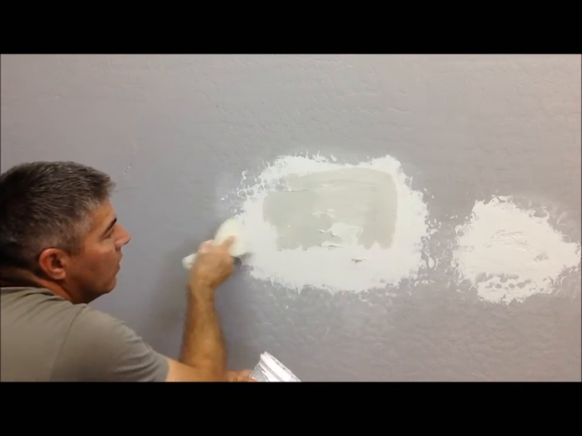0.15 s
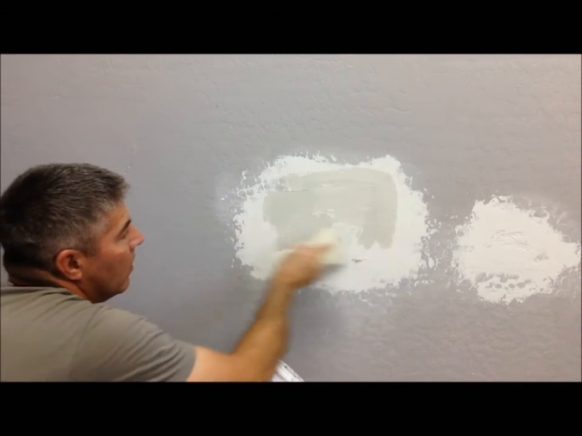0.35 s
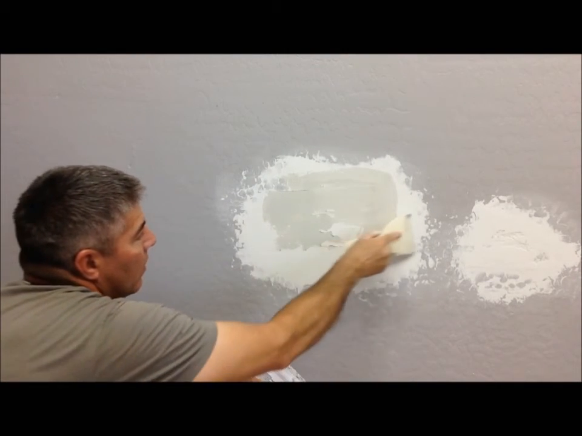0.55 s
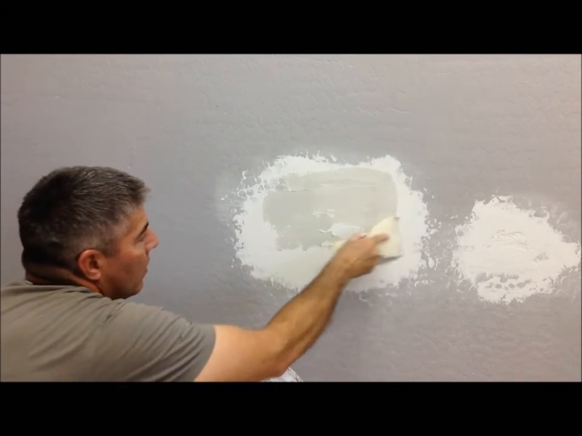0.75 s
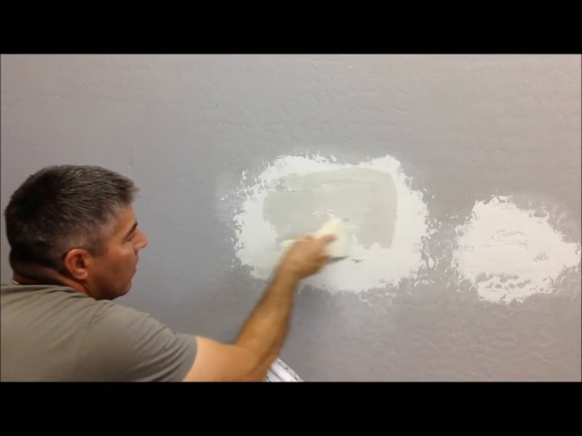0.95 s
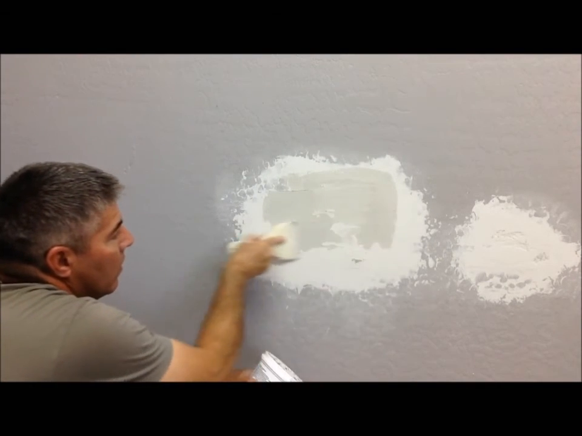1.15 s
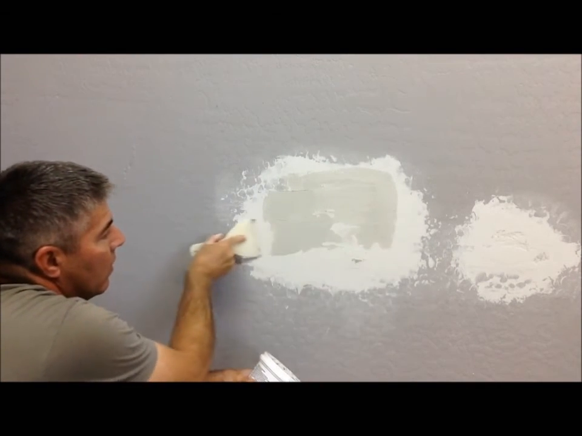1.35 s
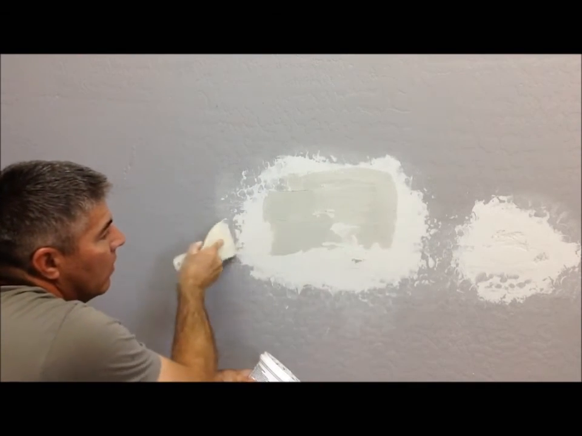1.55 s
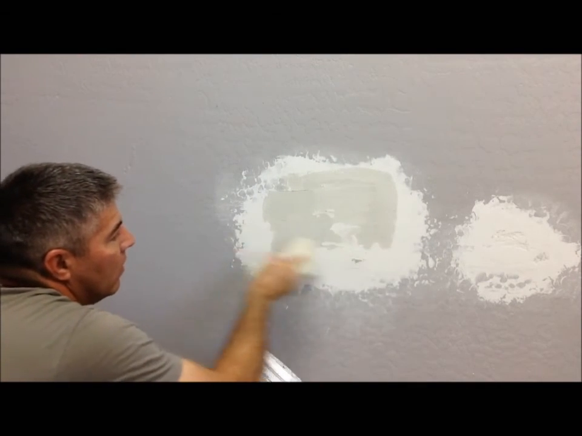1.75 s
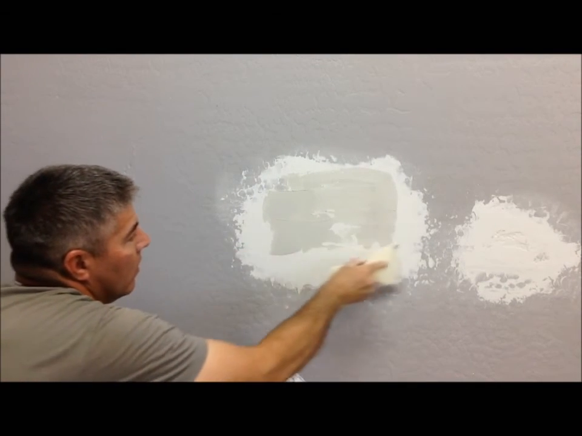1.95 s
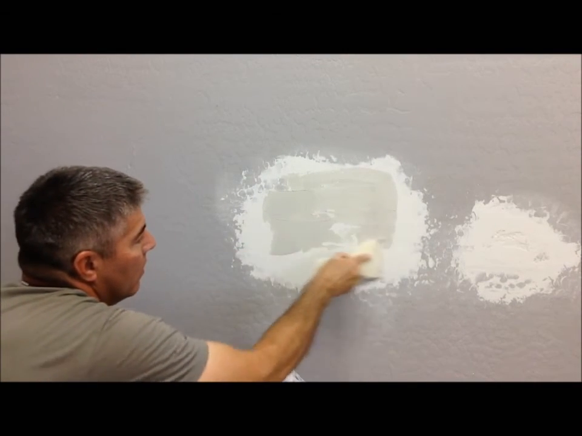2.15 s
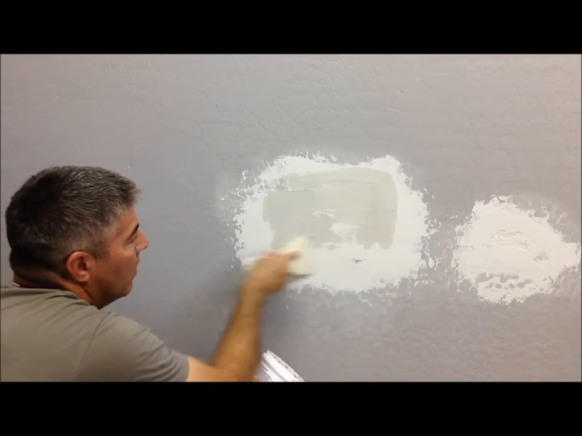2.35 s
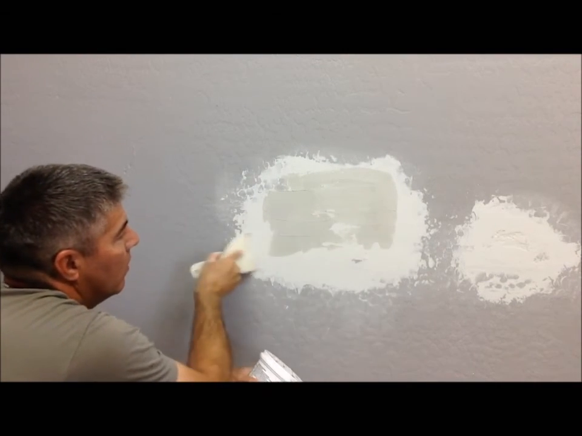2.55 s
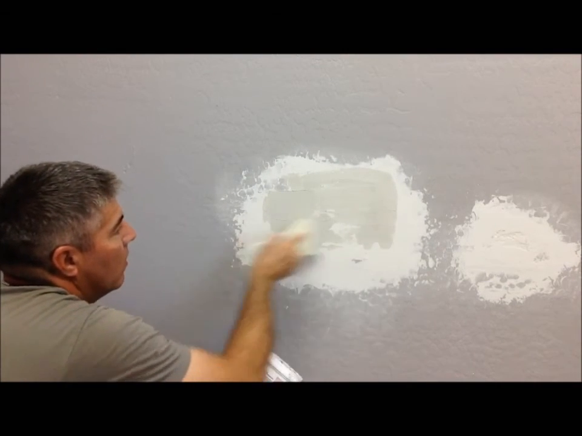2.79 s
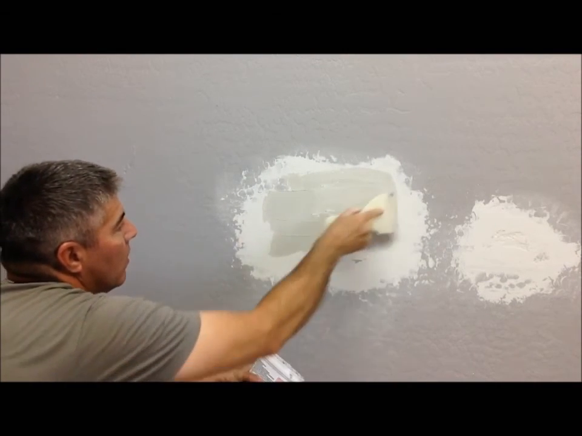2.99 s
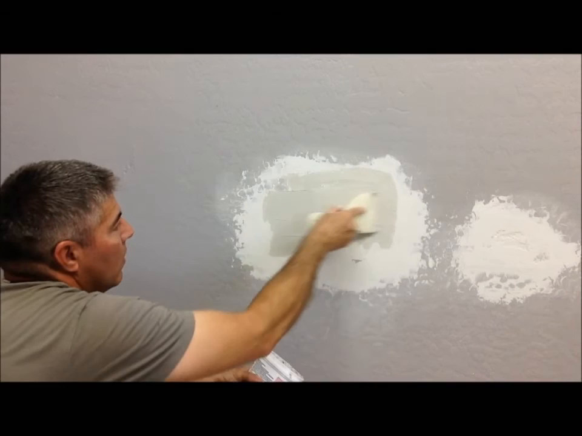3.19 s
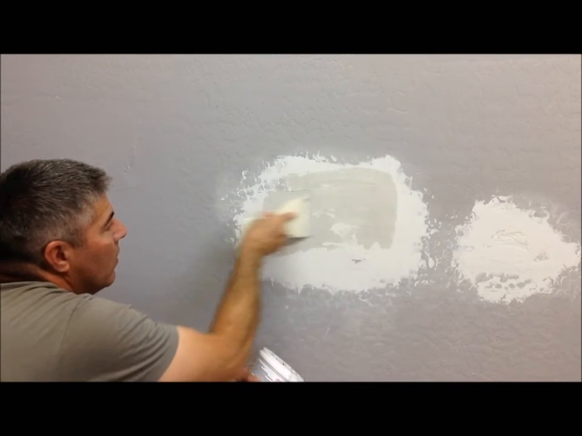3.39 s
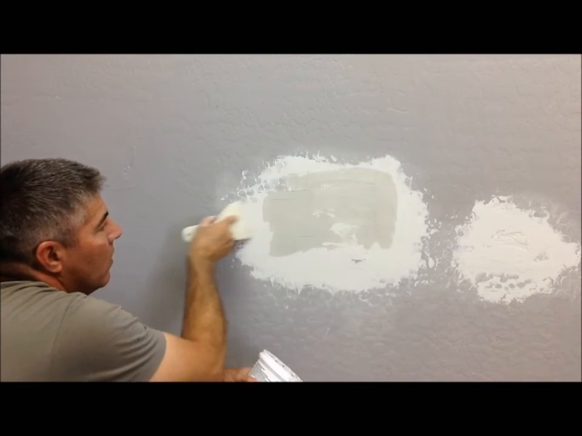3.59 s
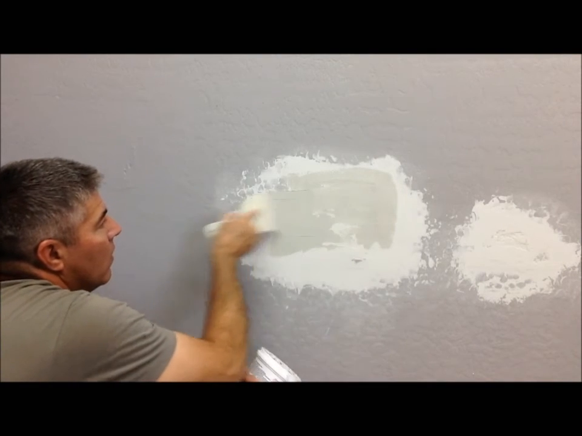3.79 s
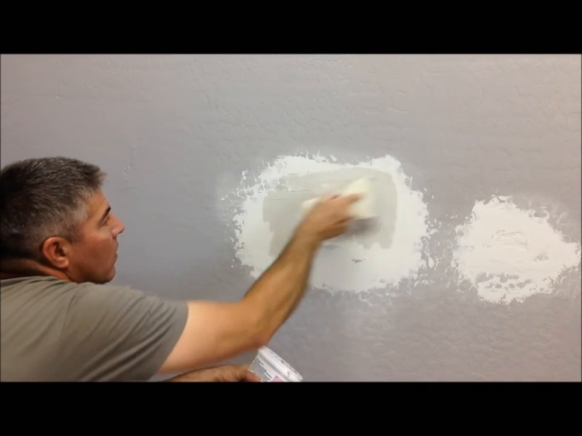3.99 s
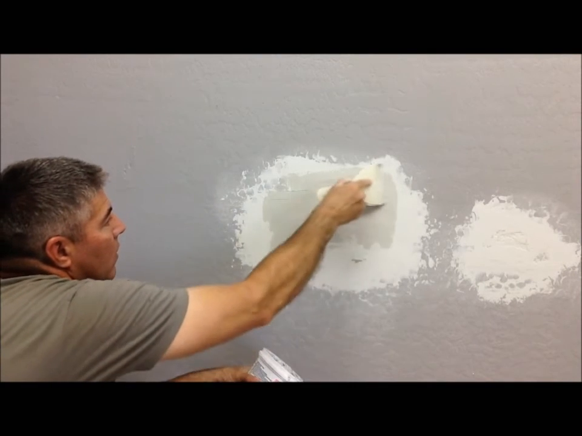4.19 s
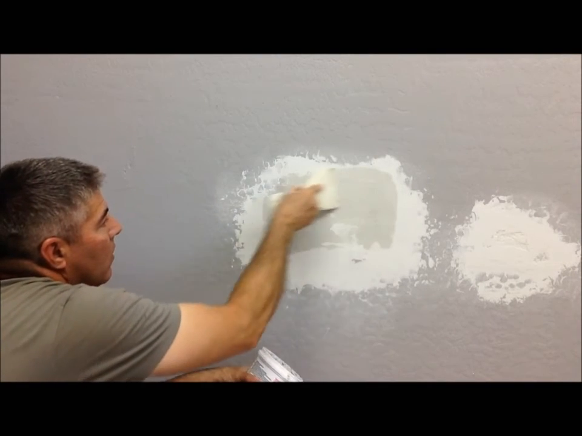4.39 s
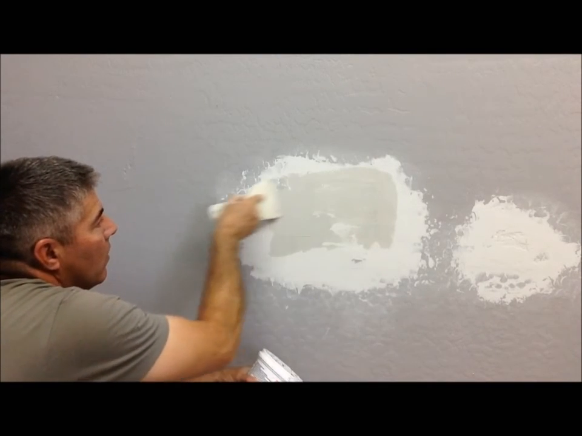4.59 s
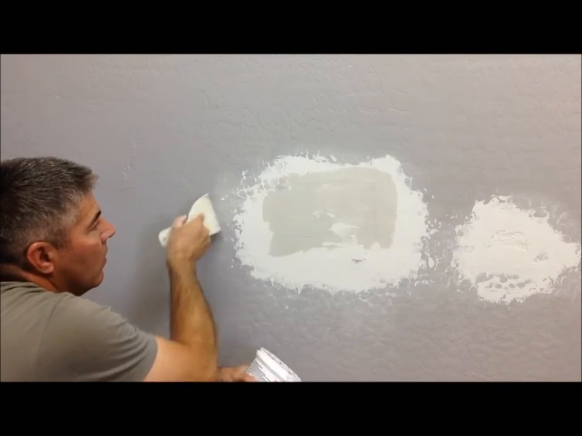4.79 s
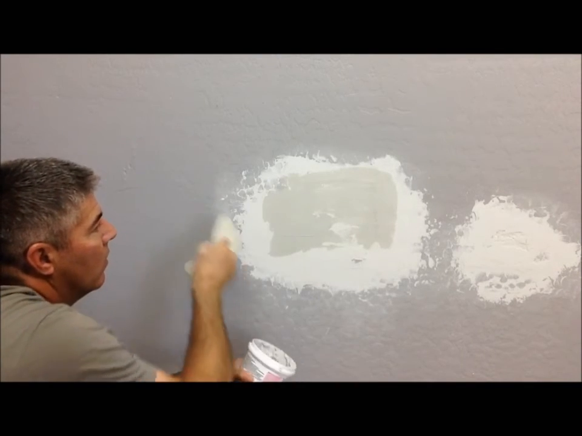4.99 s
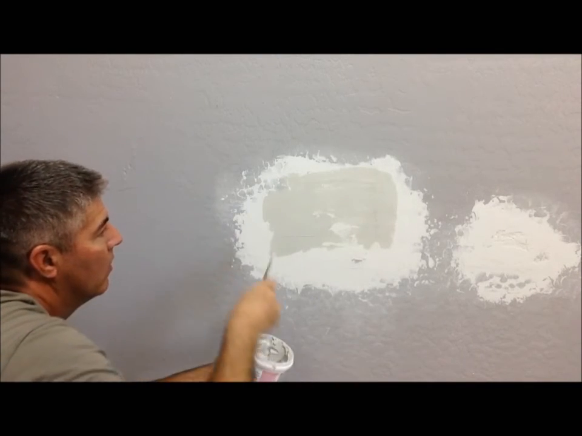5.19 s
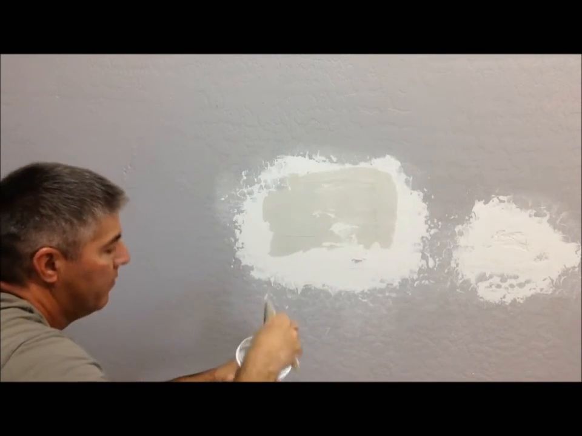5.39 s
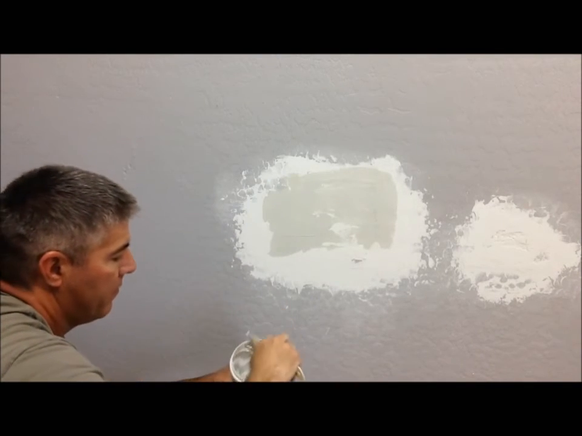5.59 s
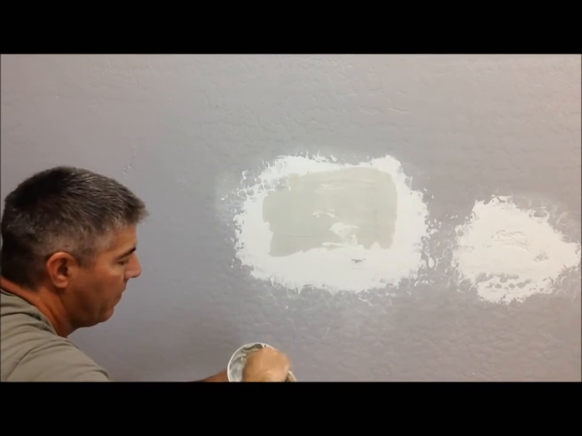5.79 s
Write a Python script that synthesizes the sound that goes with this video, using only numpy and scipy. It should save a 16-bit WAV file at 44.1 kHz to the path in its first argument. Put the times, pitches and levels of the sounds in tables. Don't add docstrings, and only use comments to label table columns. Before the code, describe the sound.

Sandy, breathy scrapes with a hollow plastic ring near two kilohertz come in four bursts, roughly a second apart, separated by quiet pauses. Clicky landings begin the pulls and harder, coarser wipes close them. After the last long uneven wipe comes a light dry rustle of the hand. Quiet air noise and low hum lie underneath, heard in mono in an empty-sounding room.

```python
import sys
import numpy as np
from scipy import signal
from scipy.fft import rfft, irfft
from scipy.io import wavfile
from scipy.ndimage import uniform_filter1d

SR = 44100
rng = np.random.default_rng(int(sys.argv[2]) if len(sys.argv) > 2 else 0)


def amp(db):
    return 10 ** (np.asarray(db, float) / 20)


def write(x):
    x = np.atleast_2d(x).T
    wavfile.write(sys.argv[1], SR, np.round(np.clip(x, -1, 1) * 32767).astype(np.int16))


N = 257524

# (frequency [Hz], spectral level [dB/Hz])
AIR = [(20, -23), (45, -6.5), (200, -12), (300, -12.5), (600, -12.5), (1400, -26), (7000, -35.5),
       (16000, -37.5)]
# (middle [s], width [s], level [dB])
HUM_SWELLS = [(.76, 0.079, -71), (1.2, 0.19, -75), (1.929, 0.21, -78), (2.19, 0.025, -59.5),
              (2.75, 0.12, -73.5), (3.18, 0.24, -77), (4.052, 0.041, -69), (5.03, 0.082, -71),
              (5.3, 0.14, -73.5), (5.63, 0.026, -72), (5.74, 0.067, -69)]
# (middle [s], width [s], level [dB], frequency [Hz])
THUDS = [(1.49, 0.086, -70, 450), (2.9, .12, -72.5, 750), (3.9, 0.05, -70.5, 440), (3.95, .12, -72, 800),
         (4.08, .1, -76, 620), (4.1, 0.18, -73.5, 217), (4.275, 0.026, -66, 168.4),
         (4.86, 0.069, -61.5, 325), (5.1, 0.34, -75.5, 237), (5.78, .05, -79, 1480)]
# (frequency [Hz], t60 [s])
ROOM_T60 = [(250, 0.94), (1000, 0.98), (2500, 0.77), (5000, 0.69), (9000, 0.46), (14000, 0.24)]
# (time [s], level [dB])
BRUSH = [
    (5.15, -93),
    (5.27, -64.5),
    (5.34, -73),
    (5.52, -77),
    (5.7, -94),
    (5.84, -83),
]
# (frequency [Hz], spectral level [dB/Hz])
RUSTLE = [(500, -8.5), (2500, 4), (6000, -2), (10000, -3.5), (15000, -0.5)]
# (time [s], tick peak [dB], knock level [dB])
LANDINGS = [
    (0.705, -51.5, -51),
    (.727, -37, -61),
    (1.034, -46, -72.5),
    (2.15, -42.5, -51),
    (3.158, -37, -61),
    (4.254, -39, -57),
    (4.317, -43.5, -56),
    (5.755, -60, -82.5),
]
# (frequency [Hz], level [dB], t60 [s])
TICK_MODES = [(900, -12, .03), (1350, -8, .022), (1850, 0, .018), (2400, -4, .014), (3250, -8, .008),
              (4400, -14, .005), (7000, -19, .003)]
# (frequency [Hz], width [Hz], level [dB])
WALL_MODES = [(141.2, 180, -7), (201, 60, -18.5), (325.3, 43, -2), (390.3, 58, -0.5), (476, 160, -8)]
# (frequency [Hz], level [dB])
BLADE = [(400, -9.5), (700, -1.5), (950, -5.5), (1200, -11), (1600, 1.5), (2000, -3), (2800, -3),
         (4000, -5.5)]
# (frequency [Hz], spectral level [dB/Hz])
SCRATCH = [(1500, -46), (2300, 0.5), (3000, 1), (4300, 0), (5200, -5.5), (6500, -26), (9000, -91)]
# (frequency [Hz], spectral level [dB/Hz])
HISS = [(2500, -32), (5000, -8.5), (6000, 2), (7300, 5.5), (10000, -2.5), (13000, -2), (16000, -18)]
# (time [s], drag [dB], slide speed [0-1], blade lean [0-1])
PULLS = [
    [(.725, -40, 0, 0.3), (.753, -46.5, 0.3, 0.2), (.8, -42.5, 0.87, 0.4), (.879, -44, 1, 0.6),
     (.995, -48, 0.82, 0.3), (1.077, -42.5, 1, 0.42), (1.15, -46, 0.93, 0.3), (1.21, -42.5, 0.57, .3),
     (1.33, -67.5, 0.2, 0.2)],
    [(2.145, -76.5, .1, 0.2), (2.16, -42.5, 0, 0.6), (2.215, -43, 1, 0.28), (2.27, -39, 1, 0.5),
     (2.305, -46, 1, .5), (2.4, -39.5, 1, 0.28), (2.46, -44.5, 1, 0.8), (2.55, -45.5, 1, 0.7)],
    [(3.155, -55.5, 0.1, 0.5), (3.197, -55.5, 0, 0.8), (3.3, -50, .8, 0.6), (3.335, -53, 0.8, .5),
     (3.415, -37.5, 0.61, .45), (3.48, -55, 1, 0.7), (3.58, -65, 1, .45)],
    [(4.255, -47, 0, 0.48), (4.33, -45, 0.3, 0.6), (4.481, -45.5, 0.74, 0.59), (4.535, -44.5, 0.96, .65),
     (4.58, -49.5, 0.7, .75), (4.64, -49.5, .7, 0.7)],
]
# (time [s], drag [dB], slide speed [0-1], blade lean [0-1])
WIPES = [
    [(0, -44, 0.97, 0.6), (.074, -50.5, 0.9, .3), (.135, -39, 0.76, 0.57), (.21, -60.5, 0.8, 0.7)],
    [(1.34, -68.5, 1, 0), (1.39, -43, 1, 0.5), (1.43, -53.5, 1, .45), (1.5, -54, 0.9, 0.6),
     (1.572, -39, 0.6, 0.5), (1.61, -46.5, 0.5, .6), (1.67, -52, 0.1, 0.5)],
    [(2.54, -43, 0.8, 0.2), (2.638, -36, 0.83, 0.5), (2.68, -48, .5, 1), (2.74, -60.5, .6, 1)],
    [(3.59, -63, .5, 0.5), (3.64, -36, 0.8, 0.4), (3.72, -42, 0.62, 0.8), (3.77, -50.5, .2, 0),
     (3.8, -51, .3, 0.1)],
    [(4.63, -57.5, 0.7, .4), (4.685, -41, 0.99, 0.7), (4.732, -48, 1, 0.8), (4.755, -35.5, 0.6, 0.3),
     (4.8, -38.5, .6, .55), (4.845, -40, .4, 0.2), (4.92, -57, 0.3, 0.4), (5.08, -73, 0.2, 0.3)],
]
PULL_RING_HZ = [1913, 1850, 1760, 1893]
WIPE_RING_HZ = [2000, 1910, 2230, 2030, 1940]
WIPE_FLEX_DB = [-26.5, -30.5, -27, -31, -23.5]
# (middle [s], frames in a row, lines kept)
STARVED = [(.627, 1, 20), (.682, 1, 24), (.853, 1, 16), (.961, 1, 14), (1.205, 1, 16), (1.49, 2, 14),
           (1.593, 1, 14), (1.738, 1, 14), (1.982, 1, 24), (2.045, 2, 20), (2.112, 1, 18), (2.161, 1, 24),
           (2.305, 1, 8), (2.58, 1, 14), (2.646, 1, 16), (3.198, 1, 20), (3.443, 1, 14), (3.509, 1, 16),
           (3.592, 1, 14), (3.656, 1, 14), (3.777, 2, 9), (3.87, 1, 16), (3.937, 2, 20), (4.04, 1, 20),
           (4.276, 1, 24), (5.087, 2, 18), (5.142, 1, 22), (5.193, 1, 24), (5.555, 1, 24)]

AIR_DB, HUM_DB, ROOM_DB = -71, -85, -6.5
RING_DB, SCRATCH_DB, HISS_DB = -7.5, -4, -4
SCRATCH_SLOW_DB, HISS_SLOW_DB = -14, -34
BEND_HZ_PER_DB, FIRM_DB = 16, -46
LEAN_DB = 14.5
FLEX_HZ, FLEX_SLOW_DB = 1317, 12.5
THRUM_DB = -36
SEATING_DB, SEATING_DB_PER_S = -59.5, -65.5
FRAME = 768
EDGE_HZ = 15400


def evened(x):
    return x / np.sqrt(np.mean(x ** 2) + 1e-20)


def smooth_noise(n, *sizes):
    x = rng.standard_normal(n)
    for size in sizes:
        x = uniform_filter1d(x, size=size)
    return evened(x)


def read(points, hz):
    f, value = np.transpose(points)
    return np.interp(np.log(hz + 1), np.log(f + 1), value)


def add(mix, s, sound):
    part = mix[round(s * SR):][:len(sound)]
    part += sound[:len(part)]


def coloured(x, points, patchy_db):
    hz, t, z = signal.stft(x, SR, nperseg=512, noverlap=384)
    patches = rng.standard_normal((len(hz), len(t)))
    patches = uniform_filter1d(patches, size=5, axis=0)
    patches = evened(uniform_filter1d(patches, size=12, axis=1))
    gain = amp(read(points, hz)[:, None] + patchy_db * patches)
    out = signal.istft(z * gain, nperseg=512, noverlap=384)[1]
    return evened(out[:len(x)])


def resonate(x, hz, width):
    turn = np.exp(2j * np.pi * np.cumsum(hz * np.ones(len(x))) / SR)
    r = np.exp(-np.pi * width / SR)
    smoothed = signal.lfilter([1 - r], [1, -r], x / turn + 1e-18)
    return 2 * (turn * smoothed).real


def ring(x, modes):
    out = np.zeros(len(x))
    for hz, width, db in modes:
        out += amp(db) * evened(resonate(resonate(x, hz, width), hz, width))
    return evened(out)


def bumps(events):
    t = np.arange(N) / SR
    return sum(amp(db) * np.exp(-((t - s) / width) ** 2) for s, width, db in events)


def air():
    spectrum = rfft(rng.standard_normal(N)) * amp(read(AIR, np.fft.rfftfreq(N, 1 / SR)))
    drift = coloured(irfft(spectrum, N), [(20, 0), (20000, 0)], patchy_db=3.0)
    hum = ring(rng.standard_normal(N), [(103.2, 24, 0)])
    out = amp(AIR_DB) * drift + (amp(HUM_DB) + bumps(HUM_SWELLS)) * hum
    for s, width, db, hz in THUDS:
        out += bumps([(s, width, db)]) * evened(resonate(drift, hz, 30))
    return out


def room(x):
    out = np.zeros(N)
    at = np.arange(300, SR - 20, 20)
    for place in range(3):
        taps = np.zeros(SR)
        taps[at + rng.integers(0, 20, len(at))] = rng.choice([-1., 1.], len(at))
        hz, t, z = signal.stft(taps, SR, nperseg=256)
        decay = amp(-60 * t / read(ROOM_T60, hz)[:, None])
        tail = signal.istft(z * decay, SR, nperseg=256)[1]
        share = np.sqrt(2 / 3) * np.cos(2 * np.pi * (2.5 * np.arange(N) / SR + place / 3))
        out += signal.fftconvolve(x * share, tail / np.linalg.norm(tail))[:N]
    return out


def brush():
    level_db = np.interp(np.arange(N) / SR, *np.transpose(BRUSH), left=-200)
    return amp(level_db) * coloured(rng.standard_normal(N), RUSTLE, patchy_db=6.0)


def landing(peak_db, wall_db):
    t = np.arange(9000) / SR
    tick = np.zeros(len(t))
    for hz, db, t60 in TICK_MODES:
        tick += amp(db - 60 * t / t60) * np.sin(2 * np.pi * (hz * t + rng.random()))
    tick *= 1.2 + smooth_noise(len(t), 40, 40)
    tick *= 1 - np.exp(-t / 0.0014)
    knock = np.zeros(len(t))
    for hz, width, db in WALL_MODES:
        knock += amp(db) * np.exp(-np.pi * width * .25 * t) * np.sin(2 * np.pi * hz * t)
    knock *= 1 - np.exp(-t / 0.015)
    return amp(peak_db) * tick / abs(tick).max() + amp(wall_db) * knock


def grit(n, per_s, spread_db, paste):
    hit = rng.random(n) < per_s / SR
    size = np.minimum(rng.exponential(1, n), 2.4)
    grains = amp(spread_db * size) * rng.standard_normal(n) * hit
    return evened(grains) + paste * rng.standard_normal(n)


def stroke(rows, grip_hz, seating_db, flex_db, wander_hz, width):
    s, *columns = np.transpose(rows)
    t = np.arange(s[0], s[-1], 1 / SR)
    n = len(t)
    drag_db, speed, lean = (np.interp(t, s, c) for c in columns)
    slow = 1 - speed
    tilt_db = LEAN_DB * (lean - .5)
    drive = grit(n, per_s=7000, spread_db=1.8, paste=1.2)
    judder_db = 0.98 * smooth_noise(n, 500)
    wander = smooth_noise(n, 900, 900)

    ring_hz = grip_hz - BEND_HZ_PER_DB * (drag_db - FIRM_DB) + wander_hz * wander
    bent = resonate(drive, np.clip(ring_hz, 900, 2800), width) + .2 * drive
    blade = amp(RING_DB + tilt_db) * coloured(bent, BLADE, patchy_db=2.2)
    tip = evened(resonate(resonate(drive, FLEX_HZ, 970), FLEX_HZ, 800))
    flex = amp(flex_db + FLEX_SLOW_DB * slow) * tip
    scratch_db = SCRATCH_DB + SCRATCH_SLOW_DB * slow - tilt_db
    scratch = amp(scratch_db) * coloured(drive, SCRATCH, patchy_db=2.4)
    hiss = amp(HISS_DB + HISS_SLOW_DB * slow) * coloured(drive, HISS, patchy_db=1.7)

    push = amp(drag_db + THRUM_DB) + amp(seating_db + SEATING_DB_PER_S * (t - s[0]))
    wall = push * ring(drive, WALL_MODES)
    knife = amp(drag_db + judder_db) * (blade + flex + scratch + hiss)
    return s[0], (knife + wall) * signal.windows.tukey(n, .04)


def scene():
    knife = np.zeros(N)
    for rows, hz in zip(PULLS, PULL_RING_HZ):
        add(knife, *stroke(rows, hz, SEATING_DB, flex_db=-31.5, wander_hz=89.7, width=300))
    for rows, hz, flex_db in zip(WIPES, WIPE_RING_HZ, WIPE_FLEX_DB):
        add(knife, *stroke(rows, hz, seating_db=-86.5, flex_db=flex_db, wander_hz=230, width=490))
    for s, peak_db, wall_db in LANDINGS:
        add(knife, s, landing(peak_db, wall_db))
    mix = air() + amp(ROOM_DB) * room(knife) + brush() + knife
    return np.array([mix, mix])


def starve(x):
    n, k = np.arange(2 * FRAME), np.arange(FRAME)[:, None]
    basis = np.sqrt(2 / FRAME) * np.cos(np.pi / FRAME * (n + .5 + FRAME / 2) * (k + .5))
    basis = basis * signal.windows.cosine(2 * FRAME)
    out = x.copy()
    for s, frames, kept in STARVED:
        first = round(s * SR) - FRAME * (frames + 1) // 2
        for start in first + FRAME * np.arange(frames):
            lines = basis @ x[start:start + 2 * FRAME]
            masked = uniform_filter1d(lines ** 2, size=24) ** .22
            step = 2 * masked * np.sort(abs(lines / masked))[-kept]
            rounded = step * np.round(lines / step)
            out[start:start + 2 * FRAME] += (rounded - lines) @ basis
    return out


def band_limit(x):
    return signal.sosfilt(signal.butter(12, 16180, fs=SR, output="sos"), x)


def record(dry):
    low_pass = signal.firwin(511, EDGE_HZ, window=("kaiser", 9), fs=SR)
    mono = starve(signal.oaconvolve(dry[0], low_pass, "same"))
    return band_limit(np.array([mono, mono]))


dry = scene()
out = record(dry)
write(out)
```